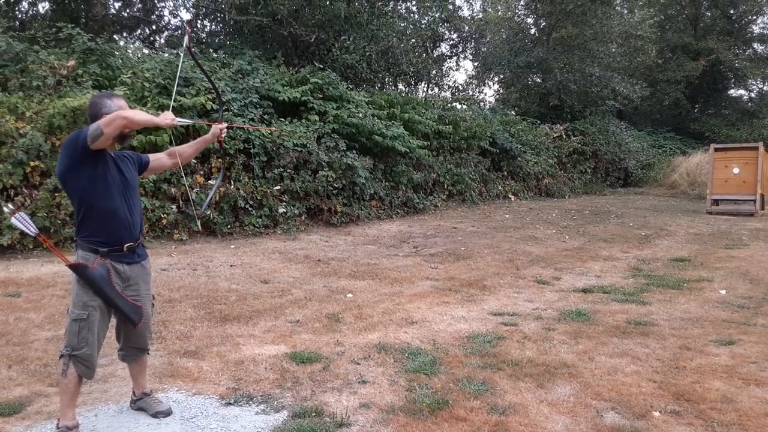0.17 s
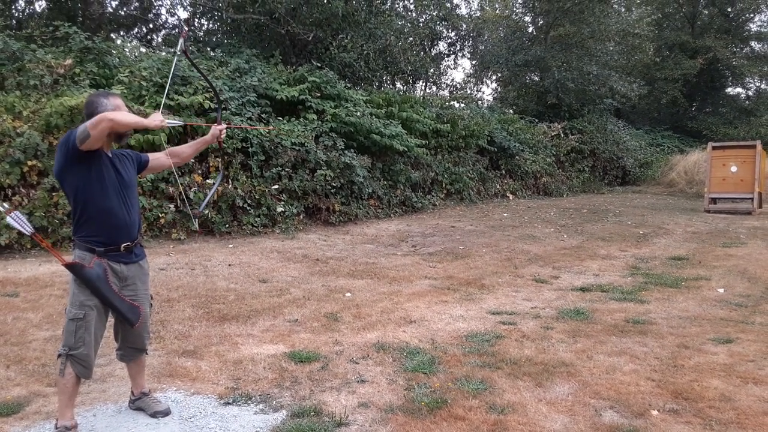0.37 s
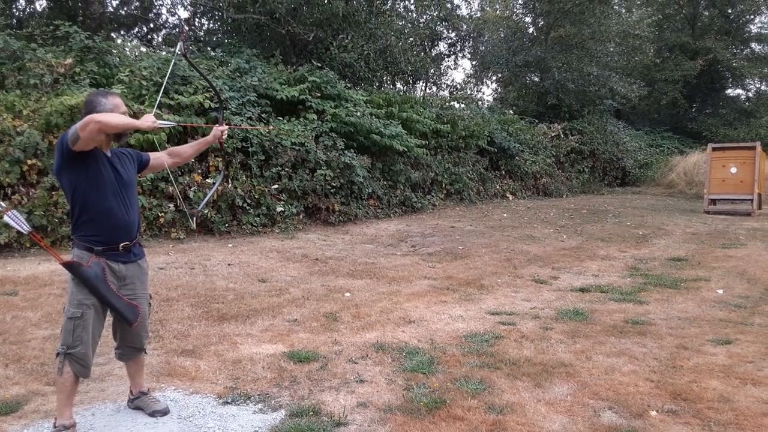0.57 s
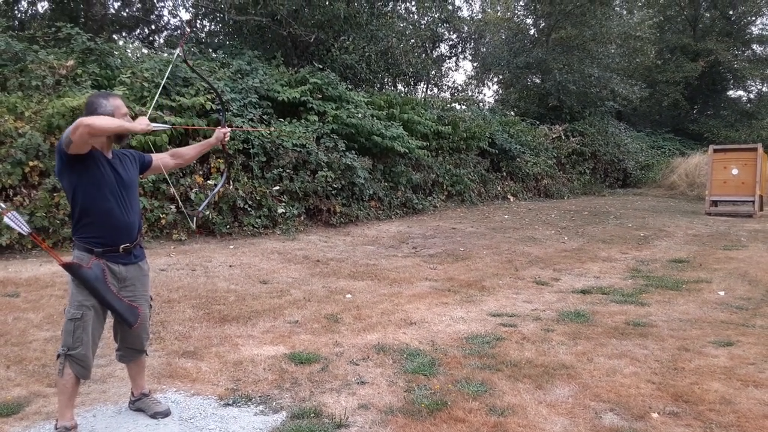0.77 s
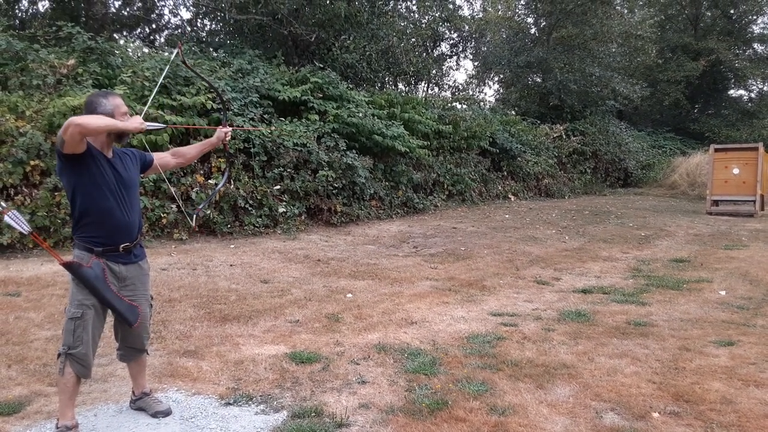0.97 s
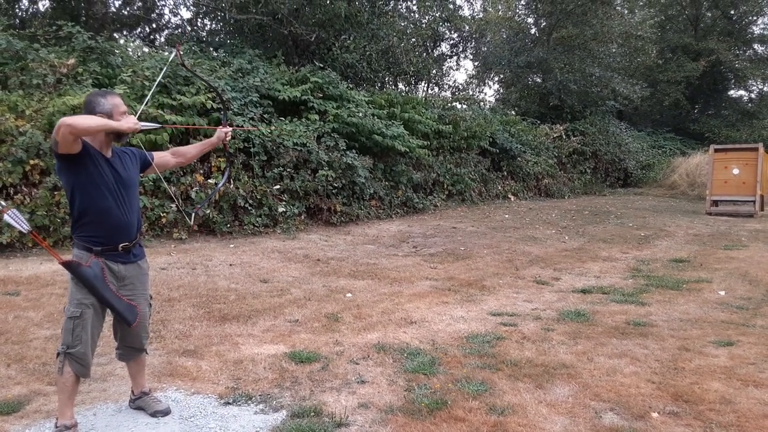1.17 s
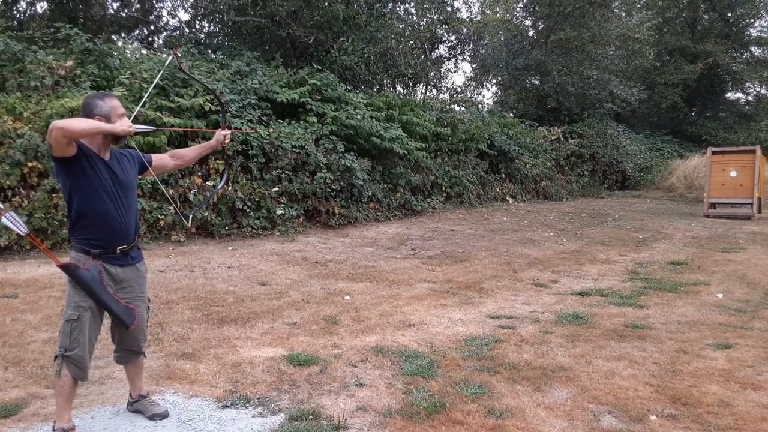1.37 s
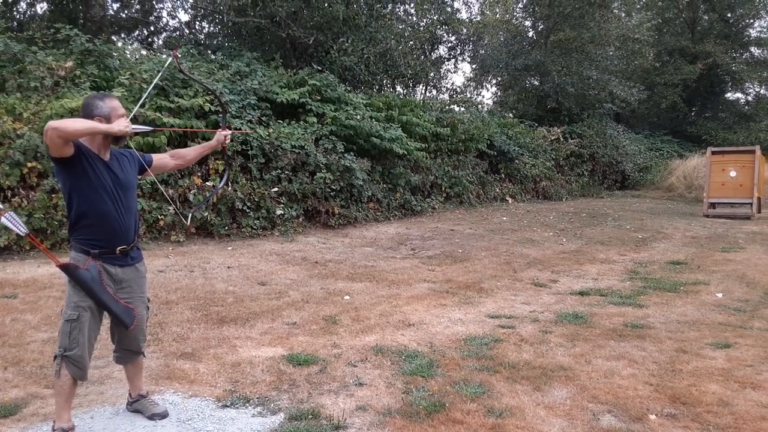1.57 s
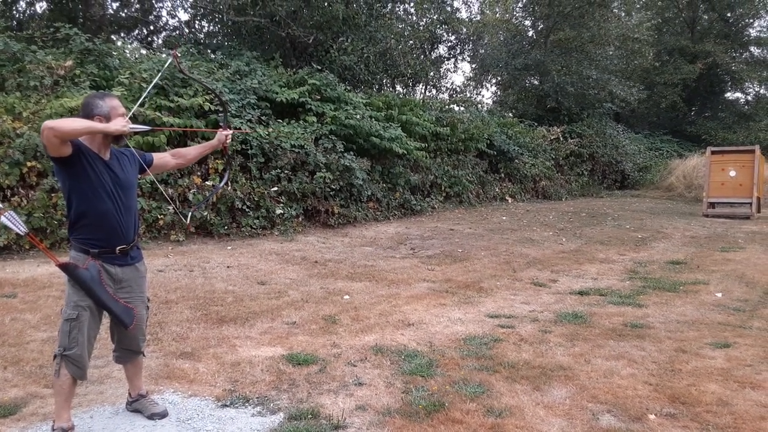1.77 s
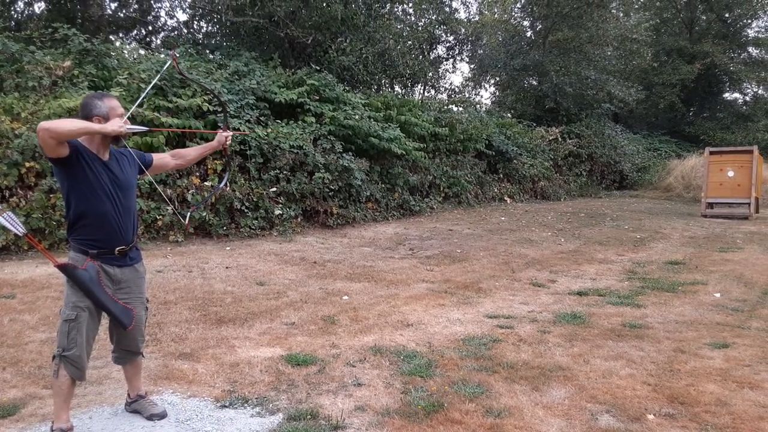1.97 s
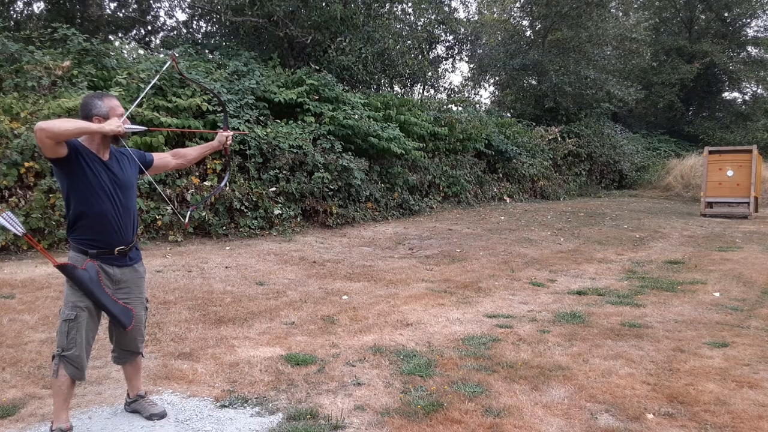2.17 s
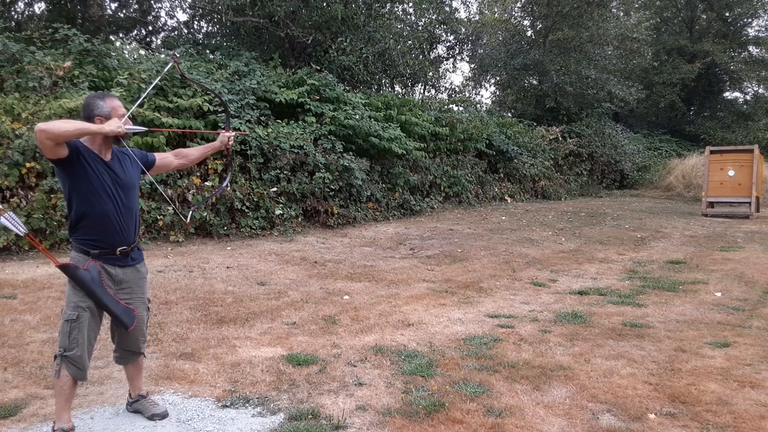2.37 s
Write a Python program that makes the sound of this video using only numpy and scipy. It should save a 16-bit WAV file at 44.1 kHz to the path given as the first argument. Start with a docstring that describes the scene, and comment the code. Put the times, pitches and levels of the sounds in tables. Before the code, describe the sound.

Distant road traffic rumbles steadily beyond a hedge, with a faint machine hum on the left; leaves stir softly, tiny ticks and one short bird peep come late, in quiet open air with light stereo microphone hiss.

```python
"""A quiet outdoor range while an archer, unheard, holds a drawn bow; two handheld microphones hiss on top.
Throughout, a distant road drones over a hedge (noise in drifting bands, plus one singing band), and
some far machine hums and whines faintly on the left (wavering sines).
Leaves stir early on (coloured noise); later a tiny tick (two decaying modes) comes from the left, then
leaves again with a second tick, a bird's peep (a gliding sine) and, during the peep, a last tick."""
import sys
import numpy as np
from scipy import signal
from scipy.fft import rfft, irfft
from scipy.io import wavfile
from scipy.ndimage import uniform_filter1d

SR = 44100
rng = np.random.default_rng(int(sys.argv[2]) if len(sys.argv) > 2 else 0)


def voltage_ratio(decibels):
    """Convert decibels (scalar or array-like) to amplitude ratios, 20 dB per decade."""
    exponent = np.asarray(decibels, float) / 20
    return 10 ** exponent


def transcribe(u):
    """Save the signal u as a 16-bit wav file named by the first command-line argument.

    u: samples, shape (n,) or (channels, n), limited to [-1, 1]; the rate is SR.
    q: integer samples, one column per channel.
    """
    v = np.clip(np.atleast_2d(u).T, -1, 1)
    q = np.round(v * 32767).astype(np.int16)
    wavfile.write(sys.argv[1], SR, q)


N = 111573
TIME_S = np.arange(N) / SR

# how alike the far road is at the two microphones: (frequency [Hz], likeness [0-1])
LIKENESS = [(60, .99), (200, 0.97), (380, 0.75), (480, 0.42), (800, 0.38), (900, 0.44), (1700, 0.07),
            (2500, 0)]
# phase by which the left microphone leads in the shared part: (frequency [Hz], lead [rad])
LEAD = [(60, 0), (300, 0.18), (800, 0), (1200, 3.5), (2000, 8), (10000, 6.5)]
FLAT = [(1, 0), (2, 0)]  # zero at every frequency
SMALL_SOURCE_RIGHT_DB = -21  # right against left, for the ticks and the bird


def over_hz(table, hz):
    """Read a (frequency [Hz], value) table on a log-frequency axis."""
    table = np.array(table, float)
    return np.interp(np.log(hz), np.log(table[:, 0]), table[:, 1])


def walk(rate_hz):
    """Random levels held 1 / rate_hz s and slewed twice; spread near 1."""
    hold = int(SR / rate_hz)
    steps = np.repeat(rng.standard_normal(N // hold + 1), hold)
    slewed = uniform_filter1d(uniform_filter1d(steps, hold), hold)
    return 1.284 * slewed[:N]


def swell(start_s, length_s):
    """A smooth rise and fall between 0 and 1."""
    return np.sin(np.pi * np.clip((TIME_S - start_s) / length_s, 0, 1)) ** 2


def left_and_right(right_db):
    """Gains that place a source: left untouched, right changed by right_db."""
    return np.array([[1], [voltage_ratio(right_db)]])


def diffuse(colour, likeness, lead):
    """Spectra of a stereo noise that is partly shared by both microphones; also their Hz axis."""
    # left against right: (frequency [Hz], left minus right [dB])
    balance_table = [(60, 2), (250, 2), (400, 3), (700, 1.5), (1400, 1), (2500, 3.5), (3400, 3), (4100, 7),
                     (4250, 3), (5000, 1), (6000, .2), (8000, 3.5), (10500, -2), (15000, -2.5)]
    hz = np.maximum(np.fft.rfftfreq(N, 1 / SR), 1)
    left, other = rfft(rng.standard_normal((2, N)))
    shared = np.clip(over_hz(likeness, hz), 0, 1)
    delayed = np.exp(-1j * over_hz(lead, hz)) * left
    right = shared * delayed + np.sqrt(1 - shared ** 2) * other
    tilt = voltage_ratio(over_hz(balance_table, hz) / 2)
    return np.array([left * tilt, right / tilt]) * voltage_ratio(over_hz(colour, hz)), hz


def mid_rms(pair):
    """Root mean square of the mean of left and right."""
    return np.sqrt(np.mean(pair.mean(axis=0) ** 2))


def tone(hz, left_db, right_db, lead, waver_db, wander_hz):
    """A sine from afar: the air makes its level and pitch waver."""
    phase = 2 * np.pi * (np.cumsum(hz + wander_hz * walk(5.9)) / SR + rng.random())
    swing = np.sqrt(2) * voltage_ratio(waver_db * walk(4.65))  # sqrt(2) turns rms into peak
    return swing * np.array([voltage_ratio(left_db) * np.sin(phase + lead), voltage_ratio(right_db) * np.sin(phase)])


def hiss():
    """Smooth microphone self-noise, mostly in the top octave, unrelated left and right."""
    # colour, relative: (frequency [Hz], density [dB per Hz])
    hiss_colour = [(6000, -45), (9900, -15), (10300, -8), (11000, -3.5), (12100, -.5), (15000, 1.2),
                   (15730, .6), (15780, -40)]
    pair = irfft(diffuse(hiss_colour, FLAT, FLAT)[0], N)
    return pair / mid_rms(pair) * voltage_ratio(-75)


def road(flicker_db=0.51, drift_db=0.38, split_hz=250):
    """Many far tyres and engines: half-octave bands that drift and flicker a little, each on its own."""
    # colour, relative within bass and within rest: (frequency [Hz], density [dB per Hz])
    road_colour = [(12, -40), (25, -15), (40, -8), (58, 1.5), (108, -1), (169, -8), (230, -10.5),
                   (299, -17), (419, -18.5), (490, -21.5), (700, -18), (810, -17), (900, -18.5),
                   (1130, -20.5), (1710, -26), (2800, -40), (4100, -42), (4250, -45), (5000, -44.5),
                   (5600, -50), (7320, -59), (10000, -63), (13000, -80), (22000, -120)]
    # mid level over time: (time [s], bass level [dB rms], rest over the bass [dB])
    road_level = [(0, -47.5, -7), (.3, -46.5, -7.5), (.6, -49, -5.5), (1.0, -45.5, -8.5), (1.3, -48, -6),
                  (1.75, -46.5, -7.5), (2.0, -48, -7), (2.3, -47, -7.5), (2.53, -53.5, -2.5)]
    pair, hz = diffuse(road_colour, LIKENESS, LEAD)
    bass, rest = np.zeros((2, 2, N))
    for octave in np.arange(3.5, 14.5, .5):
        share = np.clip(1 - 2 * abs(np.log2(hz) - octave), 0, 1)  # overlapping triangles
        wobble = voltage_ratio(drift_db * walk(1.69) + flicker_db * walk(8.83))
        part = rest if 2 ** octave > split_hz else bass
        part += wobble * irfft(pair * share, N)
    t, bass_db, rest_db = np.array(road_level).T
    bass_gain = voltage_ratio(np.interp(TIME_S, t, bass_db))
    rest_gain = voltage_ratio(np.interp(TIME_S, t, bass_db + rest_db))
    return bass / mid_rms(bass) * bass_gain + rest / mid_rms(rest) * rest_gain


def drone(centre_hz=808, width_hz=35):
    """Tyres on the far road sing in one narrow band of noise that swells and sinks."""
    # mid level over time: (time [s], level [dB rms])
    drone_level = [(0, -64.5), (.2, -63), (.35, -71), (.7, -73), (1.0, -67.5), (1.6, -72.5), (2.0, -69.5),
                   (2.53, -63.5)]
    pair, hz = diffuse(FLAT, LIKENESS, LEAD)
    bell = np.exp(-.5 * ((hz - centre_hz) / width_hz) ** 2)
    band = irfft(pair * bell, N)
    t, db = np.array(drone_level).T
    return band / mid_rms(band) * voltage_ratio(np.interp(TIME_S, t, db))


def machine(mains_hz=119.72):
    """A far machine: multiples of the mains hum and a few slowly fading or growing whines."""
    # hum before its waver: (multiple, left [dB rms], right [dB rms], lead of left [rad])
    hum_table = [(1, -59, -66, 0.5), (3, -70, -77, -0.2), (5, -72.5, -77.5, 0.8), (10, -71.5, -76, 2.5),
                 (14, -84, -86, -2)]
    # middle pitch of each thin whine: frequency [Hz]
    whine_hz = [3833, 3966.5, 4033, 1978]
    # each whine at time zero: (left [dB rms], right [dB rms], growth [dB/s], fading if negative)
    whine_table = [(-82, -98, -1.5), (-82, -98, -1.5), (-89, -104, 1.5), (-79, -82, -3)]
    out = np.zeros((2, N))
    for multiple, left_db, right_db, lead in hum_table:
        out += tone(round(multiple) * mains_hz, left_db, right_db, lead, waver_db=2.5, wander_hz=0.53)
    for hz, (left_db, right_db, growth) in zip(whine_hz, whine_table):
        whine = tone(hz, left_db, right_db, 0, waver_db=0.0, wander_hz=0.92)
        out += voltage_ratio(growth * TIME_S) * whine
    return out


def leaves():
    """Soft airy noise swells from the hedge, a little grainy, stronger on the left."""
    # stirrings: (middle [s], length [s], left level at the top, before the grain [dB rms])
    rustles = [(0.406, 0.47, -85.5), (1.823, 0.54, -84.5)]
    # colour, relative: (frequency [Hz], density [dB per Hz])
    leaf_colour = [(3000, -30), (5500, -4), (7500, -3), (9500, -9), (11000, -10), (16000, -34)]
    colour = voltage_ratio(over_hz(leaf_colour, np.fft.rfftfreq(N, 1 / SR) + 1))
    pair = irfft(rfft(rng.standard_normal((2, N))) * colour, N)
    swells = sum(voltage_ratio(db) * swell(middle - length / 2, length) for middle, length, db in rustles)
    grain = voltage_ratio(3.5 * walk(30))
    return pair / pair.std() * swells * grain * left_and_right(-7)


def bird():
    """A peep off to the left: a near sine that glides up quickly and settles."""
    # peeps: (start [s], length [s], from [Hz], towards [Hz], left level at the top [dB rms])
    peeps = [(2.062, 0.063, 3680, 3880, -75)]
    out = np.zeros(N)
    for start, length, low, high, db in peeps:
        glide = np.exp(-np.clip(TIME_S - start, 0, length) / (0.42 * length))
        hz = high + (low - high) * glide
        out += voltage_ratio(db) * np.sqrt(2 * swell(start, length)) * np.sin(2 * np.pi * np.cumsum(hz) / SR)
    return out * left_and_right(SMALL_SOURCE_RIGHT_DB)


def ticks():
    """Each tick rings in two close modes that beat, followed by its scatter from the hedge."""
    # ticks on the left: (time [s], peak of the ring alone [dB], first mode [Hz])
    tick_table = [(1.357, -63, 3440), (1.80, -63, 3120), (2.1012, -57, 3435)]
    mode_ratio, ring_t60_s = 1.056, 0.066
    tail_db, tail_t60_s = -6, 0.19  # tail peak against the ring's
    out = np.zeros(N + SR)
    t = np.arange(SR // 5) / SR
    for start, db, hz in tick_table:
        modes = np.sin(2 * np.pi * hz * t) - 0.78 * np.sin(2 * np.pi * mode_ratio * hz * t)
        onset = 1 - np.exp(-t / 0.00086)
        ring = modes * voltage_ratio(-60 * t / ring_t60_s) * onset
        scatter = rng.standard_normal(len(t)) * voltage_ratio(-60 * t / tail_t60_s)
        tail = np.convolve(ring[:SR // 300], scatter)[:len(t)]  # only the ring's start is scattered
        at = int(start * SR)
        out[at:at + len(t)] += voltage_ratio(db) * (ring / ring.max() + voltage_ratio(tail_db) * tail / tail.max())
    return out[:N] * left_and_right(SMALL_SOURCE_RIGHT_DB)


def scene():
    """All that sounds around the microphones, added up."""
    return road() + drone() + machine() + leaves() + bird() + ticks()


def top_cut(x):
    """Nothing passes above the cut-off."""
    return signal.sosfilt(signal.butter(12, 15890, fs=SR, output="sos"), x)


def record(dry):
    """The two microphones cut the deep bass and add their hiss."""
    low_cut = signal.butter(2, 40, "high", fs=SR, output="sos")  # 40 Hz
    # a mirrored quarter second ahead lets the filter settle
    run_in = np.concatenate([dry[:, SR // 4:0:-1], dry], axis=1)
    heard = signal.sosfilt(low_cut, run_in)[:, SR // 4:]
    return top_cut(heard + hiss())


dry = scene()
out = record(dry)
transcribe(out)
```